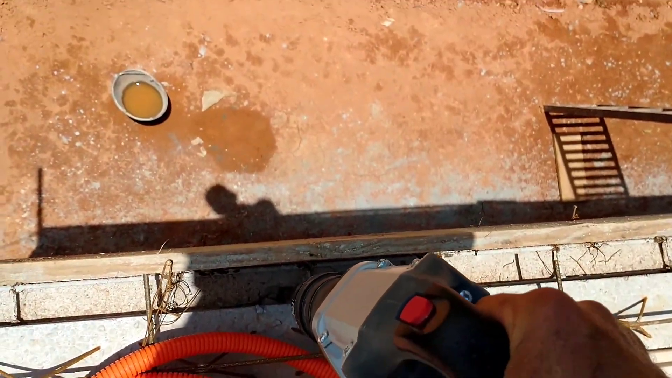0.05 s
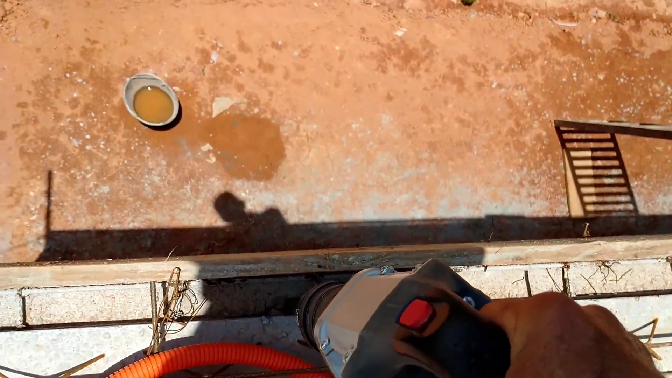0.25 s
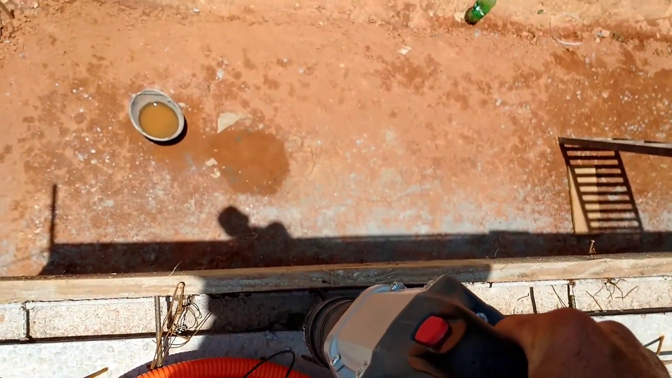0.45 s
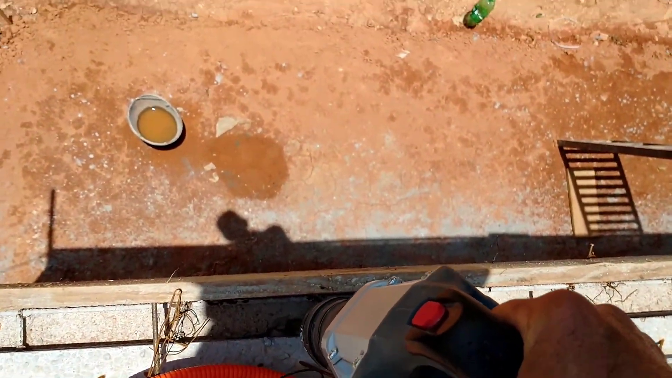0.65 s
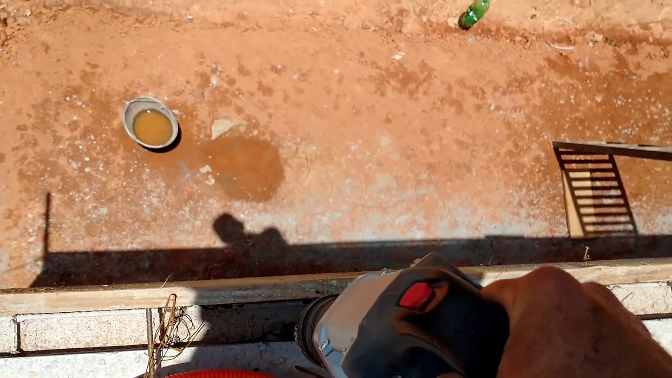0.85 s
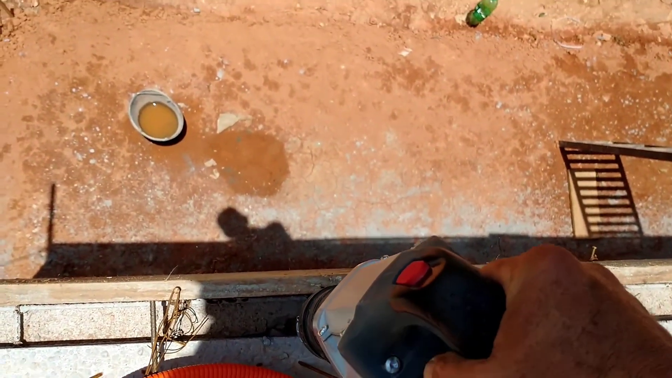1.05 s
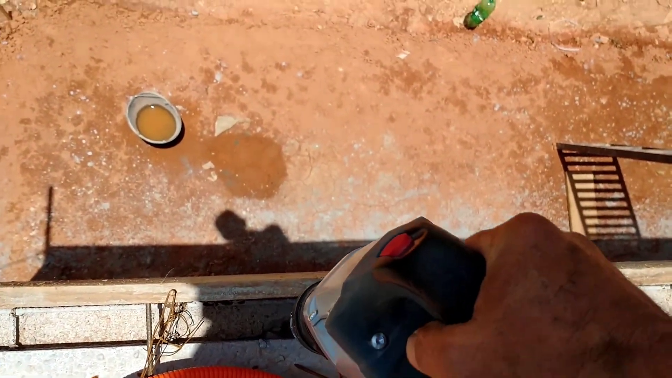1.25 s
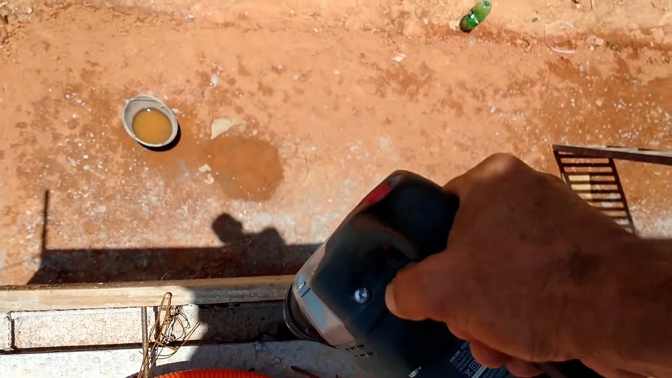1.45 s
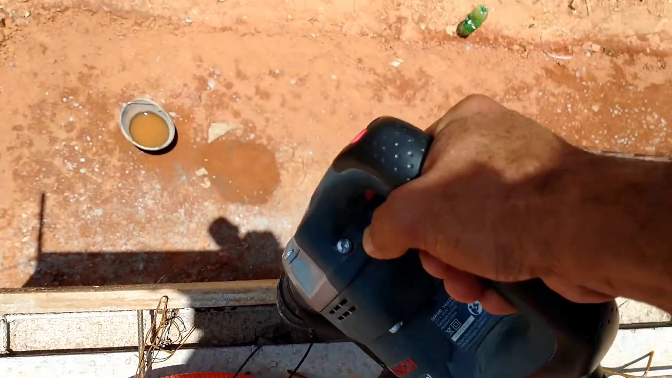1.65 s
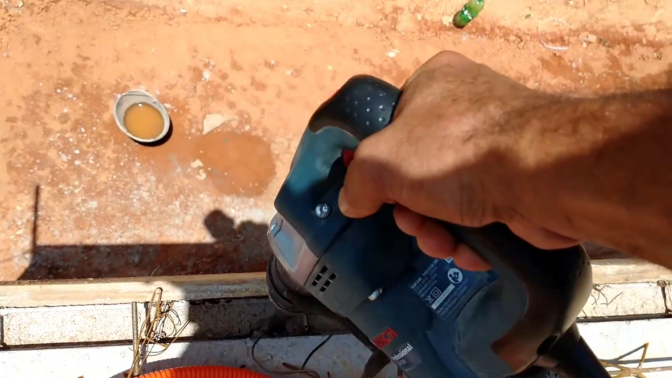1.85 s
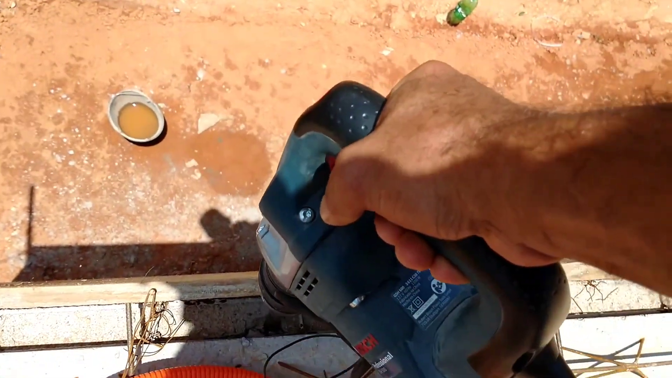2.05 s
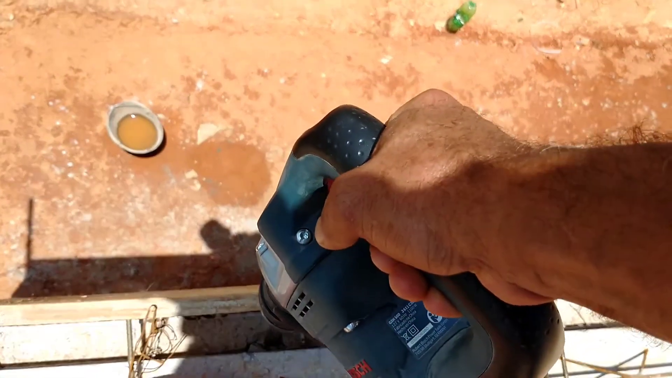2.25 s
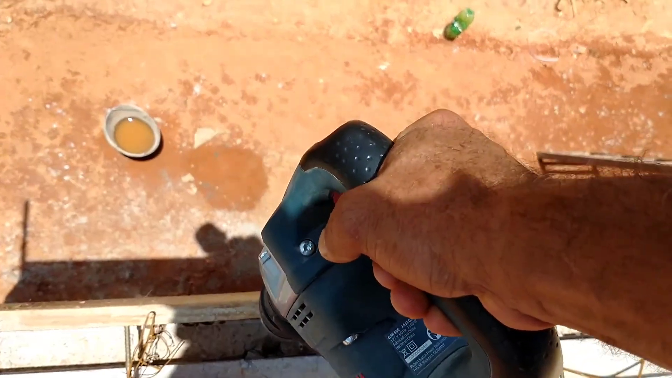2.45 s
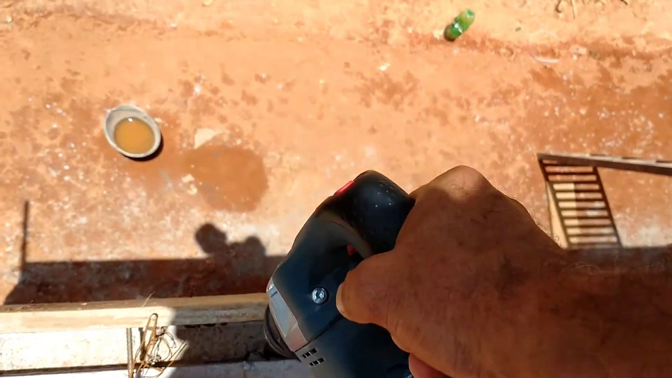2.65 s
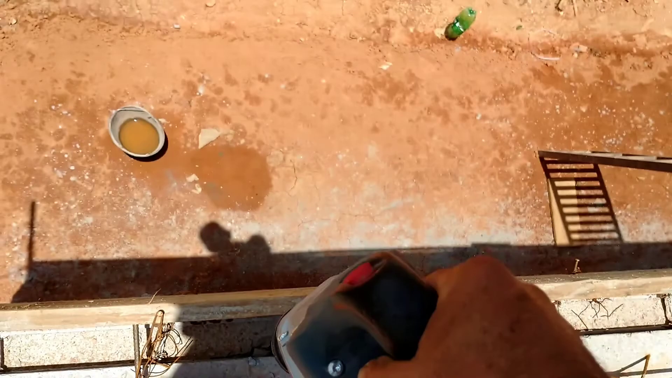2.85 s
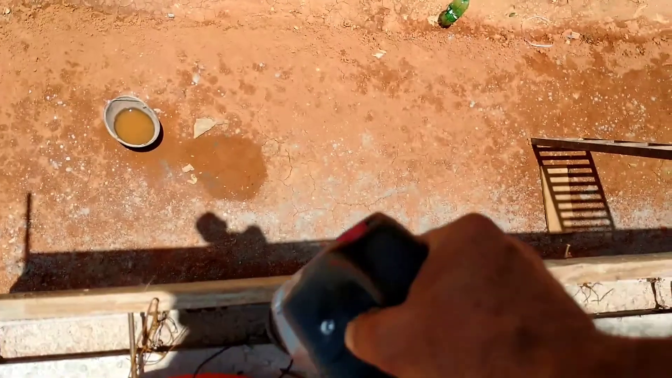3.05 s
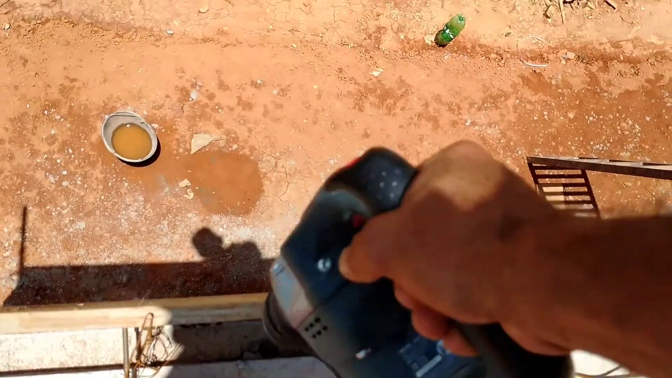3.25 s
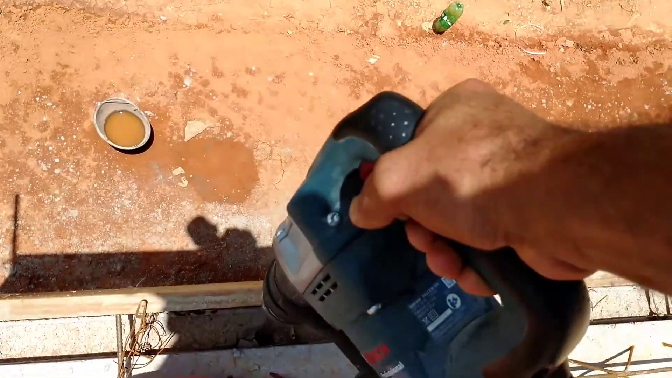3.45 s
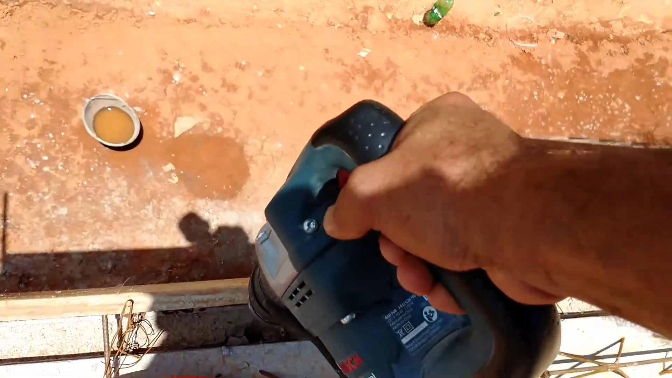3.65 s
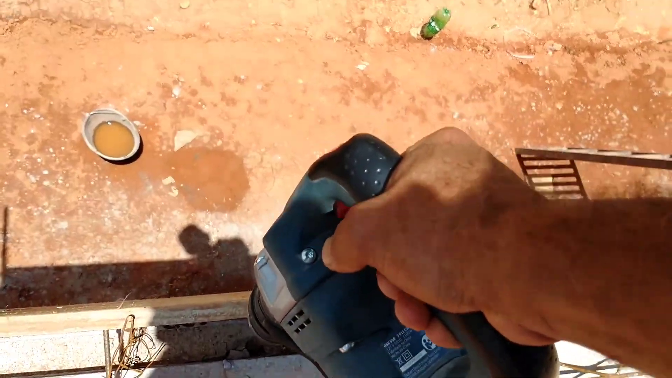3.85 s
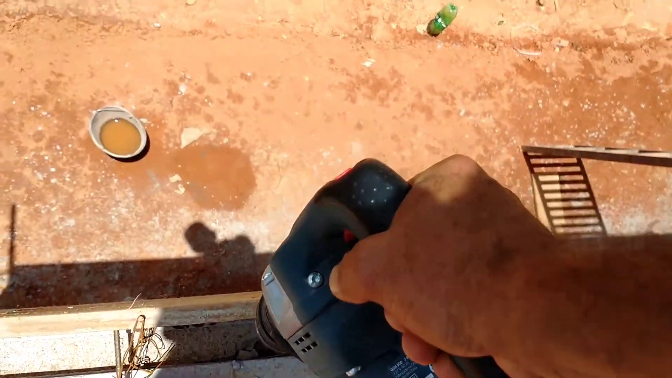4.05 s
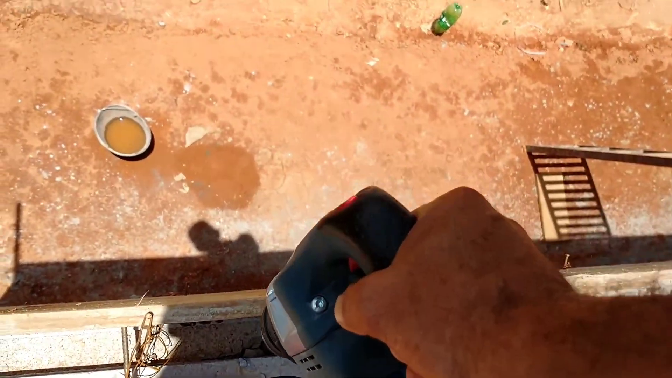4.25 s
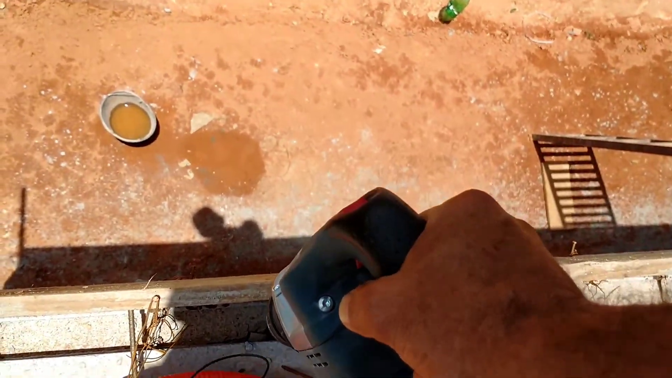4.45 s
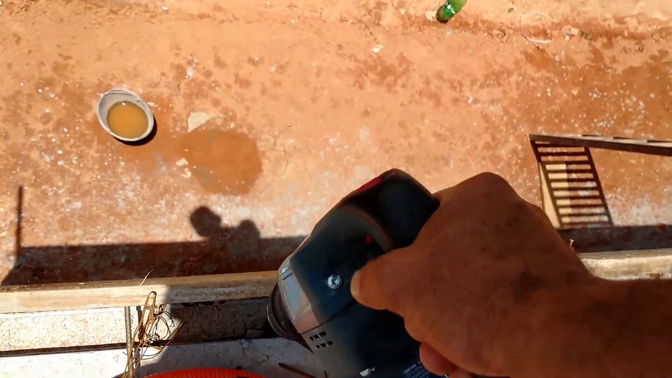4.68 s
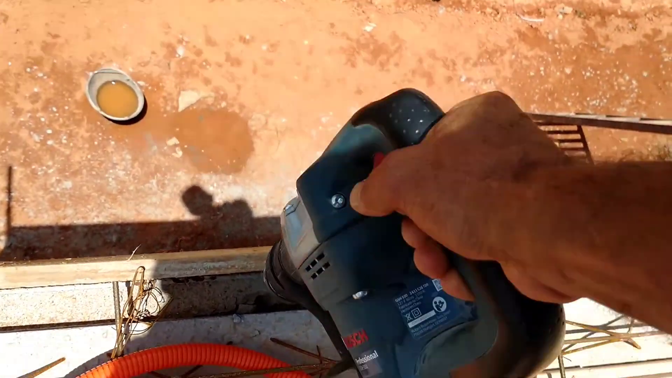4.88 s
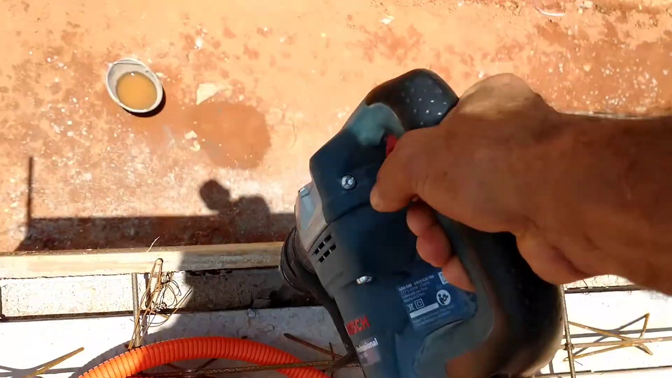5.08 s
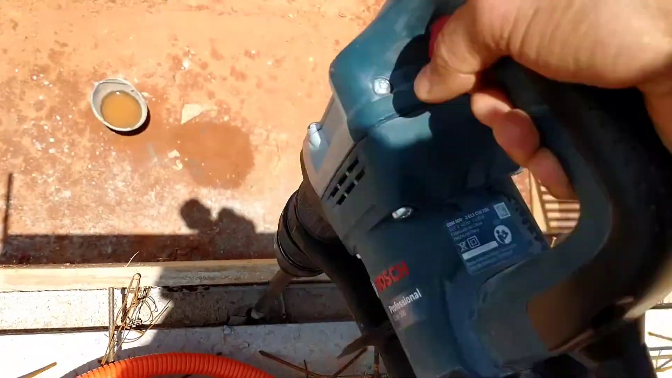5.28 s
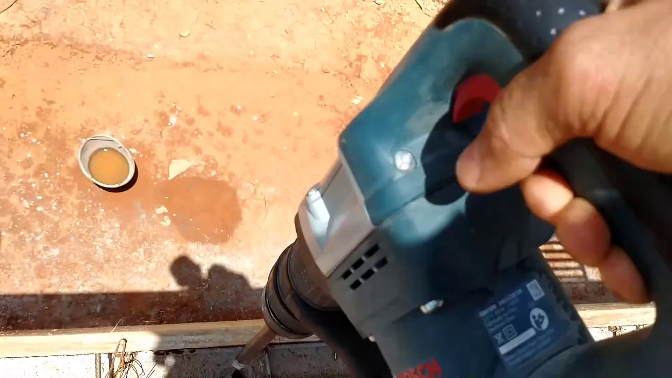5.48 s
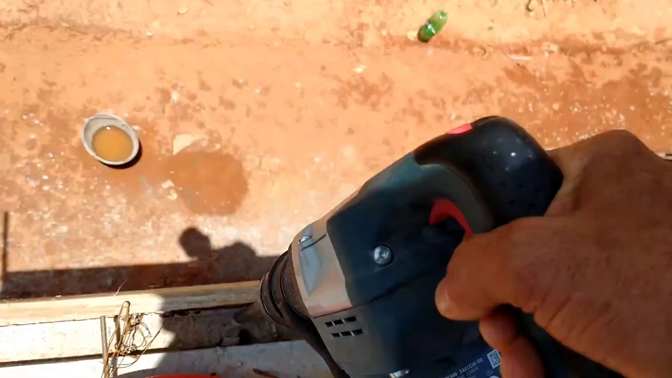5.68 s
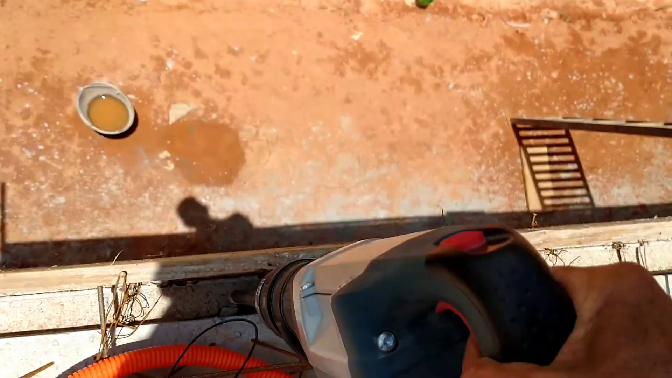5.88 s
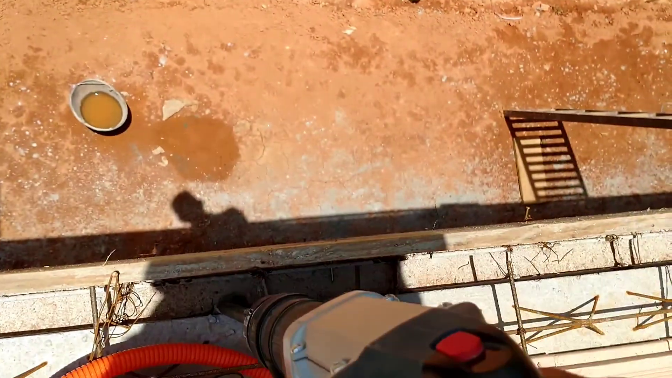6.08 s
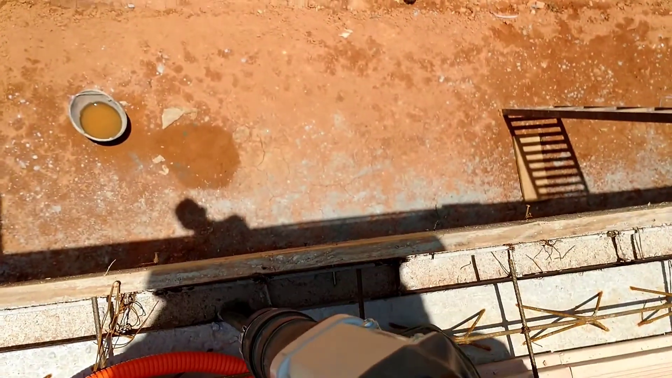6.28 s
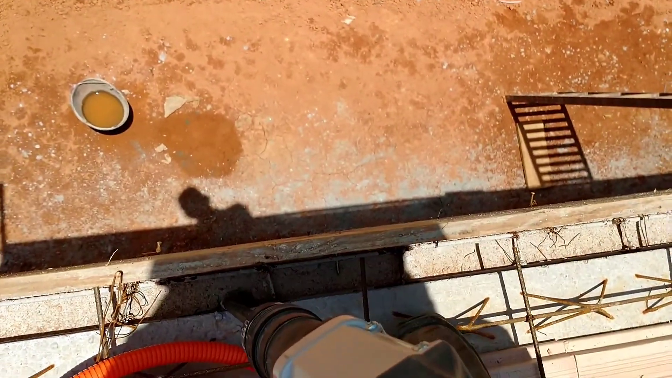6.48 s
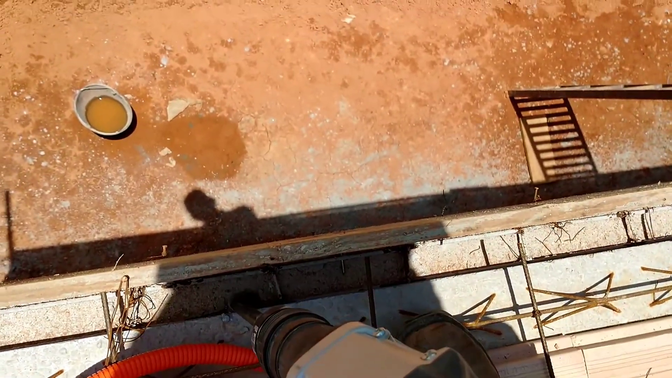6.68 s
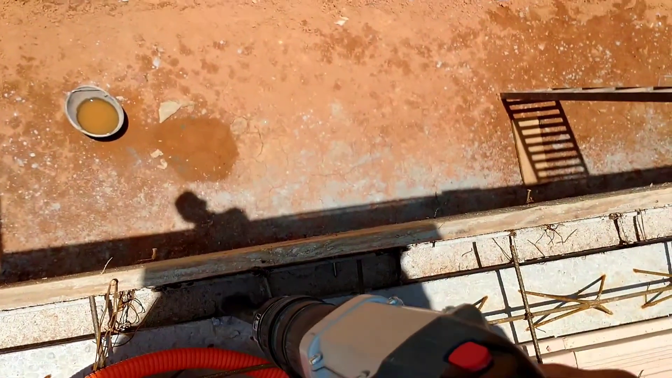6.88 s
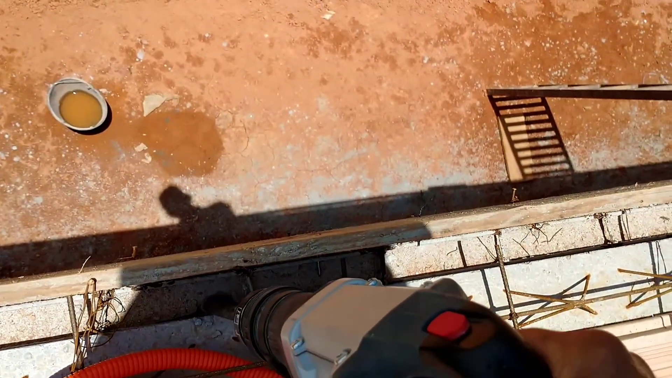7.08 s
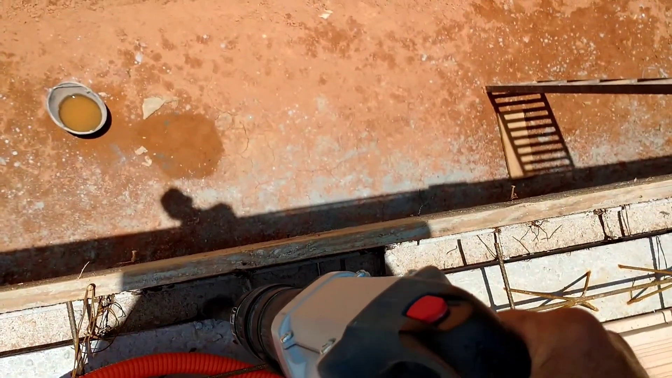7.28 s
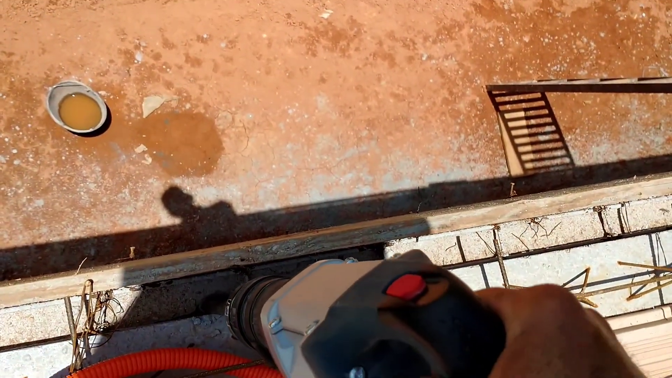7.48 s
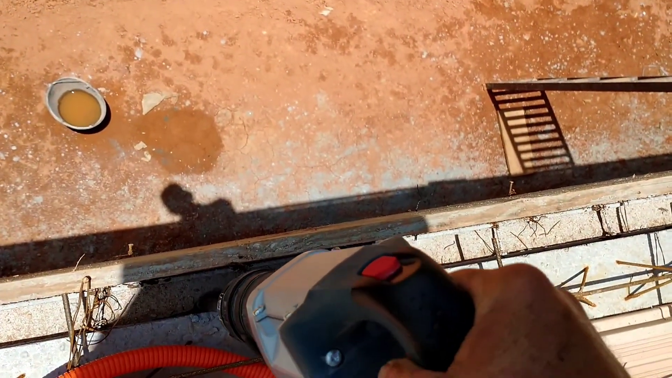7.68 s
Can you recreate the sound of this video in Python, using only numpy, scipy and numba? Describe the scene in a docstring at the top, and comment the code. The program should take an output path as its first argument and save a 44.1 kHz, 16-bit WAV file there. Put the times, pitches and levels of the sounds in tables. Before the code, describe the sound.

Close, harsh machine-gun hammering of a power chisel on concrete outdoors, a brief pause as the motor winds down, then striking resumes.

```python
"""A hand-held electric demolition hammer chisels a concrete edge outdoors, close under a small microphone.
Each crank turn while striking throws one blow that rings slab, chisel and barrel modes and rattles debris.
The motor adds filtered-noise hiss and gear tones locked to the crank angle. The trigger is let go briefly,
then for longer: the motor coasts almost to rest, with brief knocks, clicks and a squeak, and striking
starts again. Short echoes and the quiet noise of the site lie around the tool."""
import sys
import numpy as np
from scipy import signal
from scipy.fft import rfft, irfft
from scipy.io import wavfile
from scipy.ndimage import uniform_filter1d
from numba import njit

SR = 44100
rng = np.random.default_rng(int(sys.argv[2]) if len(sys.argv) > 2 else 0)


def digitize_waveform(pressure):
    """Quantize a signal to 16-bit integers and store it at the path in sys.argv[1].

    Rows of a 2-D input are taken as channels; values are limited to [-1, 1].
    """
    field = np.atleast_2d(pressure).T
    bounded = np.clip(field, -1, 1)
    quanta = np.round(bounded * 32767).astype(np.int16)
    wavfile.write(sys.argv[1], SR, quanta)


N = 340893
T = np.arange(N) / SR
TOP_SPEED = 47.5  # reference crank speed, turns per s
# spans in which the hammer strikes: (from [s], to [s])
STRIKING_SPANS = [(-1, 5.08), (6.54, 9)]
# five groups of modes, the first of the formwork, the rest of the slab:
# (frequency [Hz], relative level [dB], nominal t60 [s])
SLAB_MODES = [
    [(179.6, -8, 0.2), (228.4, -5.5, 0.21)],
    [(332.3, -8, 0.047), (390, -22, 0.019)],
    [(483.3, -5.5, 0.2), (526, -1, 0.11)],
    [(553.5, -2.5, 0.22), (636.7, 13, 0.1), (661, 8, 0.039)],
    [(794, -17.5, 0.062), (872.7, 2, 0.051), (1063, 0.5, 0.025), (1293, -28.5, 0.039), (1442, 1.5, 0.017),
     (1654, -13, 0.099)],
]


def undb(db):
    """Amplitude gain is ten to the power of a twentieth of the decibels."""
    return 10 ** (np.asarray(db) / 20)


def level(x, db=0):
    """Normalise by the root mean square, the amplitude measure of power."""
    return x * undb(db) / np.sqrt(np.mean(x ** 2))


def noise():
    """White noise: equal power in every hertz."""
    return rng.standard_normal(N)


@njit
def ring(x, hz, t60):
    """Damped resonance: a rotating phasor driven by x, with a ring time given for every sample."""
    y, z, turn = np.empty(len(x)), 0j, np.exp(2j * np.pi * hz / SR)
    for i in range(len(x)):
        z = z * turn * (1 - 6.9 / (t60[i] * SR)) + x[i] + 1e-18
        y[i] = z.imag
    return y


def fade(x, t60):
    """Exponential decay: a one-pole filter gives each impulse a tail that falls 60 dB in t60 seconds."""
    return signal.lfilter([1], [1, -np.exp(-np.log(1000) / (t60 * SR))], x)


def colour(x, spectrum, size=2048):
    """Minimum-phase filtering: folding the cepstrum makes a (Hz, dB) shape causal."""
    hz, db = np.transpose(spectrum)
    bins_hz = np.arange(1, size // 2 + 2) * SR / size
    cepstrum = irfft(np.log(undb(np.interp(np.log(bins_hz), np.log(hz), db))))
    cepstrum[1:size // 2] *= 2
    cepstrum[size // 2 + 1:] = 0
    return signal.fftconvolve(x, irfft(np.exp(rfft(cepstrum))))[:N]


def walk(rate):
    """Band-limited chance: random steps, rate per second, smoothed twice, with a spread near 1."""
    k = int(SR / rate)
    steps = np.repeat(rng.standard_normal(N // k + 1), k)
    return 0.86 * uniform_filter1d(uniform_filter1d(steps, k), k)[:N]


def train(seconds, sizes):
    """Impulsive excitation: one sample at each given moment."""
    out = np.zeros(N)
    np.add.at(out, np.clip((seconds * SR).astype(int), 0, N - 1), sizes)
    return out


def during(t, spans):
    """Gating: 1 inside the spans, 0 outside, with 2 ms edges."""
    return sum(np.clip((t - a) * 500, 0, 1) - np.clip((t - b) * 500, 0, 1) for a, b in spans)


def striking():
    """Gate of the striking spans, its edges smoothed over 2000 samples (45 ms)."""
    return uniform_filter1d(during(T, STRIKING_SPANS), size=2000)


def swell(at, width, db):
    """Gaussian gain that falls to 1/e of its peak one width [s] away."""
    return undb(db) * np.exp(-((T - at) / width) ** 2)


def over_time(table):
    """Linear interpolation of a (time, value) table at every sample."""
    return np.interp(T, *np.transpose(table))


def modes(x, table, gain, share, wander_db=0., order=-1):
    """Modal superposition: x drives each mode with wandering strength; order -1 alternates their phase."""
    out = 0
    for k, (hz, db, t60) in enumerate(table):
        drive = gain * undb(wander_db * walk(3.99)) * x
        out = out + order ** k * undb(db) * ring(drive, float(hz), t60 * share)
    return out / np.std(out / gain)


def site_air():
    """Stationary background: the still air of the site as spectrally shaped noise."""
    # (frequency [Hz], spectral density [dB per Hz])
    site_spectrum = [(18, -18), (45, -4), (110, -6), (672, -13), (1660, -30), (1880, -37), (7840, -43),
                     (12000, -48), (15600, -87), (22000, -120)]
    return level(colour(noise(), site_spectrum), -58)


def crank():
    """Rotational dynamics: the trigger pulls the speed to its target; blows or friction slow it when let go."""
    # trigger held: (from [s], to [s])
    trigger_spans = [(.318, 4.232), (4.558, 4.938), (6.455, 9)]
    # speed the motor heads for under its load: (time [s], speed [turns per s])
    full_speed = [(1.807, 46.172), (2.026, 47.763), (3, 47.523), (4.2, 47.903), (4.6, 45.675), (6, 46.101)]
    start_turn, start_speed = .465, 48.501  # turns, turns per s
    loaded_spin_up_s, free_spin_up_s = .191, .138  # time constants
    blow_brake, friction = 66.561, 18.266  # turns per s lost each second
    drag = .34  # share of the speed lost each second
    step = .002  # s
    t = np.arange(0, T[-1] + 2 * step, step)
    v = [start_speed]
    targets = np.interp(t, *np.transpose(full_speed))
    for on, busy, full in zip(during(t, trigger_spans), during(t, STRIKING_SPANS), targets):
        pull = (full - v[-1]) / (loaded_spin_up_s if busy > .5 else free_spin_up_s)
        brake = busy * blow_brake + (1 - busy) * (friction + drag * v[-1])
        v.append(max(v[-1] + step * (on * pull - (1 - on) * brake), .5))
    v = np.array(v[:-1])
    turns = start_turn + step * (np.cumsum(v) - v)
    return np.interp(T, t, v), np.interp(T, t, turns)


def motor_hiss(speed, turns):
    """Turbulent noise of fan and brushes: a power law of speed, modulated twice a turn."""
    # colour of the hiss: (frequency [Hz], spectral density [dB per Hz])
    housing = [(88, -49.5), (150, -11), (213, -12), (328, -9), (439, -6.5), (534, 1), (923, -4), (1080, -8),
               (1310, -5), (2220, -14.5), (2650, -11.5), (4000, -23), (5150, -16), (7770, -16.5),
               (16000, -45.5)]
    # low rumble of the turning motor, growing with speed: (frequency [Hz], spectral density [dB per Hz])
    rumble = [(25, -6), (60, -2), (150, -5), (400, -12), (1500, -52)]
    # hiss swells as the crank shudders over its last compressions: (time [s], level before throb [dB])
    shudders = [(6.04, -42), (6.19, -45), (6.271, -42), (6.39, -51)]
    hiss_power, treble_power, rumble_power = 1.69, 1.65, 0.47  # exponents of amplitude over speed
    relative = speed / TOP_SPEED
    # the slower it turns, the lumpier it runs
    lumpy = np.clip(30 / speed, 0, 1.6)
    throb = undb(lumpy * (1.55 * np.cos(4 * np.pi * turns + 1.65) + 2.1 * walk(45)))
    blowing = undb(-22) * relative ** hiss_power + sum(swell(s, .017, db) for s, db in shudders)
    air = level(colour(noise(), housing))
    treble = signal.sosfilt(signal.butter(2, 3970, "high", fs=SR, output="sos"), air)
    air = air + treble * (relative ** (treble_power - hiss_power) - 1)
    hiss = air * throb * blowing
    hiss += level(colour(noise(), rumble), -44) * relative ** rumble_power
    # loose gears chatter while the tool is not striking, 5 chance ticks a turn
    ticks = (rng.random(N) < 5 * speed / SR) * rng.exponential(size=N)
    return hiss * (1 + .45 * (1 - striking()) * fade(ticks, .02))


def gear_whine(speed, turns):
    """Tooth-mesh tones follow the crank, swell near case resonances and pulse with the piston's compression."""
    # (tooth contacts [per crank turn], relative level [dB], case resonance that lifts it [Hz])
    gears = [(86.1, 0, 2550), (104.3, -9, 4970), (44, -17, 2100), (150.5, -11, 4700)]
    lift_width_hz, lift_db = 900, 13
    flicker_db = (1.5, 4.5)  # striking, free
    stall_speed = 28  # turns per s at which the strain is full
    busy = striking()
    free = 1 - busy
    # gears labour when a slow crank strikes: louder and more sharply pulsed
    strain = busy * np.clip((TOP_SPEED - speed) / (TOP_SPEED - stall_speed), 0, 1) ** 2
    squeeze = np.exp((1.4 + 8 * strain) * (np.cos(2 * np.pi * (turns + 0.12)) - 1))
    # running free the whine is stronger but the case lifts it less
    coast_db, lift_share = 2.5 * free, busy + .2 * free
    whine = 0
    for teeth, db, hz in gears:
        lift = lift_share * lift_db / (1 + (2 * (teeth * speed - hz) / lift_width_hz) ** 2)
        flicker = np.interp(free, (0, 1), flicker_db) * walk(30)
        tone = np.sin(2 * np.pi * teeth * turns + 0.43 * walk(60))
        whine = whine + undb(db + coast_db + lift + flicker) * tone
    # below 20 turns per s it fades as the cube of the speed
    return undb(-37 + 10 * strain) * np.clip(speed / 20, 0, 1) ** 3 * squeeze * whine


def knocks_and_clicks():
    """Impact excitation: short noise bursts ring damped slab modes and a housing mode."""
    # brief knocks and clicks, the last the trigger being pulled:
    # (time [s], relative peak [dB], tick over thud drive [dB])
    impacts = [(5.211, -3, -3), (6.019, -17, -2.5), (6.273, -23.5, -11), (6.385, -29, -22),
               (6.46, -25.5, -7)]
    at, peak_db, tick_db = np.transpose(impacts)
    burst = fade(train(at, undb(peak_db)), 0.0083) * noise()
    clack = 0
    for group in SLAB_MODES[1:]:
        for k, (hz, db, t60) in enumerate(group):
            # level differences halved and ring times cut to 0.28
            clack = clack + (-1) ** k * undb(.5 * db) * ring(burst, float(hz), np.full(N, 0.28 * t60))
    tick = fade(train(at, undb(peak_db + tick_db)), 0.013) * noise()
    housing = ring(tick, 3050., np.full(N, .015))
    tick = .8 * uniform_filter1d(tick, size=4) + .16 * housing
    return undb(-23.5) * clack + undb(-5.0) * tick


def squeak():
    """Frequency glide: one brief sine falls in pitch under a half-sine envelope."""
    start_s, length_s, from_hz, to_hz = 6.392, .03, 7400, 5300
    u = np.clip((T - start_s) / length_s, 0, 1)
    pitch = to_hz + (from_hz - to_hz) * (1 - u) ** 2
    return undb(-56) * np.sin(np.pi * u) * np.sin(2 * np.pi * np.cumsum(pitch) / SR)


def blow_trains(speed, turns):
    """Periodic impact: one blow per crank turn, then a weaker rebound about 7 ms later."""
    at = np.interp(np.arange(1, int(turns[-1]) + 1), turns, T)
    strikes = sum((at > a) & (at < b) for a, b in STRIKING_SPANS) > 0
    chance = rng.standard_normal((len(at), 3))[strikes].T
    at = at[strikes]
    # fewer blows a second carry the same power, but a slow crank cannot fling the striker hard
    rate = np.interp(at, T, speed)
    blows = train(at, undb(0.27 * chance[0]) * np.clip(rate / 28, 0, 1) ** 3 / np.sqrt(rate))
    rebounds = train(at + .007 + .001 * chance[1], undb(-31.5 + 1.0 * chance[2]))
    return blows, rebounds


def slab_thud(blows, rebounds, speed, slab_db, slab_hz, form_db):
    """Modal response of slab and formwork; groups far from the favoured pitch respond less."""
    tops = [max(group, key=lambda mode: mode[1])[0] for group in SLAB_MODES[1:]]
    # 10.5 dB weaker one octave away, growing as the square of the distance
    gains = undb([form_db] + [slab_db - 10.5 * np.log2(hz / slab_hz) ** 2 for hz in tops])
    # slower blows ring shorter
    share = np.clip((speed / TOP_SPEED) ** 1.3, .2, 3)
    push = uniform_filter1d(blows + .5 * rebounds, size=9)
    return sum((-1) ** k * modes(push, group, gains[k], share, order=1)
               for k, group in enumerate(SLAB_MODES))


def steel_ring(blows, rebounds, turns, chisel_db, tilt_db, free_db):
    """Boundary-dependent modes: the tip held by concrete damps the chisel, the freed shank rings longer."""
    # tip held, two groups, mostly below and mostly above 7.5 kHz:
    # (frequency [Hz], relative level [dB], t60 [s])
    chisel = [
        [(5084, -2, 0.022), (4730, -14, 0.029), (5374, 4.5, 0.014), (6800, -39, 0.011), (6556, 17.5, 0.0079),
         (6880, 14, 0.011), (7270, 12.5, 0.027), (13500, -9, .008)],
        [(7572, 13, 0.0095), (7707, 16, 0.016), (8160, 14.5, 0.0063), (8830, 9, 0.011), (9510, 0.5, 0.014),
         (14740, 2, 0.011), (15300, -13, .015), (5740, 1, 0.014)],
    ]
    # lengthwise modes of the shank: (frequency [Hz], relative level [dB], t60 while free [s])
    free_ring = [(7430, 8, 0.11), (7560, -1.5, 0.05), (14620, -4, .05)]
    # modes of the metal barrel: (frequency [Hz], relative level [dB], t60 [s])
    barrel_modes = [(2130, -2.5, 0.034), (2296, -2, 0.038), (2440, -3.5, 0.033), (2686, 2.5, 0.029),
                    (2970, 2.5, 0.026), (3106, 3, 0.012), (3435, -8, 0.05)]
    # how loud the blows ring the barrel: (time [s], relative level [dB])
    barrel_db = [(.5, -33), (1.6, -23), (2.0, -31), (3.7, -25.5), (4.3, -29.5), (6.8, -39), (7.3, -26.5)]
    wander_db = 2.2
    held = np.ones(N)
    # steel on steel: a clean hit, then a short splutter of contacts, different every blow
    hits = blows + rebounds
    hit = 5.1 * hits + 0.36 * fade(hits, 0.013) * noise()
    # the tool holder passes each hit on through one broad mode
    chuck_hz, chuck_t60 = 6980., .0005 * held
    contact = ring(hit, chuck_hz, chuck_t60)
    first = modes(contact, chisel[0], undb(chisel_db - tilt_db / 2), held, wander_db)
    second = modes(contact, chisel[1], undb(chisel_db + tilt_db / 2), held, wander_db)
    barrel = modes(hit, barrel_modes, undb(over_time(barrel_db)), held, wander_db)
    # the shank rings freely until the tip seats again, near the middle of the turn
    unseated = (turns % 1 < .55 + .12 * walk(40)) & (during(T - .01, STRIKING_SPANS) > 0)
    strong = contact + ring(15 * blows, chuck_hz, chuck_t60)
    free = modes(strong, free_ring, undb(free_db), np.where(unseated, 1, .2), wander_db)
    return undb(3.5) * (first + second) + undb(-11.5) * free + undb(-3.5) * barrel


def body_shake(turns):
    """Harmonic vibration: the body sways at twice and shakes at three times the crank speed."""
    # stronger sway when the tool lurches: (time [s], width [s], level before a common lift [dB])
    lurches = [(0.031, 0.072, -35), (.85, .2, -56), (5.0, .25, -38), (7.07, 0.18, -32)]
    # shake at three times the crank speed: (time [s], level before a common lift [dB])
    shake = [(0.0, -39), (.85, -53), (1.57, -37.5), (2.0, -44.5), (2.75, -39), (4.19, -36), (4.4, -48.5),
             (6.6, -45.5), (6.8, -35), (7.1, -40), (7.45, -41)]
    twice = undb(-57) + sum(swell(*lurch) for lurch in lurches)
    thrice = undb(over_time(shake))
    # the common lift of 6 dB wavers a little
    return striking() * sum(gain * undb(6.0 + 0.6 * walk(12)) * np.sin(2 * np.pi * k * turns)
                            for k, gain in ((2, twice), (3, thrice)))


def debris_rattle(blows, rebounds):
    """Granular noise: a decaying, unsteady burst of shaped noise follows each impact."""
    # (frequency [Hz], spectral density [dB per Hz])
    debris = [(59, -29), (100, -10.5), (135, -26), (255, -27), (328, -2), (406, -11.5), (471, -4),
              (872, -6.5), (1870, -26), (2750, -11), (3780, -23), (7450, -15), (10900, -32.5), (14700, -27),
              (16000, -48)]
    rattle = fade(blows + rebounds, 0.053) * undb(1.4 * walk(300)) * noise()
    return level(colour(rattle, debris), -26.0)


def hammer(speed, turns):
    """Common excitation: the same impacts drive slab, steel and debris, as the chisel's seat changes."""
    # how the chisel sits in the concrete, levels relative: (time [s], slab level [dB],
    # favoured slab pitch [Hz], formwork level [dB], held chisel level [dB],
    # second over first chisel group [dB], free ring level [dB])
    seat = [(0.0, -22.5, 630, -32, -25.5, 3, -37), (.3, -19, 620, -31.5, -27.5, 1, -33),
            (.62, -19.5, 616, -35.5, -27.5, 5, -24), (1.1, -21, 810, -33.5, -26.5, 7, -32),
            (1.45, -22, 614, -31.5, -23, 2, -32), (1.72, -18.5, 575, -30.5, -23, -3, -28),
            (1.9, -14, 480, -41.5, -25.5, -3, -25), (2.25, -17, 610, -31.5, -28.5, -0.5, -44),
            (2.7, -16, 590, -42, -27.5, -3.5, -28), (3.03, -16.5, 557, -42, -28, 8, -37),
            (3.12, -20.5, 640, -44, -26.5, -0.5, -42), (3.55, -19.5, 560, -39, -27, -5, -40),
            (3.74, -17, 650, -64, -26, -5, -52), (4.24, -16, 586, -51, -30.5, -11, -38),
            (4.55, -14, 490, -47, -37.5, 2, -36), (4.85, -16.5, 537, -29, -30.5, -3, -6.5),
            (5.05, -19.5, 500, -32, -41, -13, -6), (6.6, -51, 500, -36, -44.5, -31.5, -8),
            (6.78, -24, 453, -27, -28, -7.5, -7.5), (7.15, -23.5, 526, -29, -23.5, 1.5, -8),
            (7.5, -22.5, 483, -32.5, -25.5, -3, -10), (7.7, -20, 570, -27, -27, -9, -8.5)]
    s, *columns = np.transpose(seat)
    slab_db, slab_hz, form_db, chisel_db, tilt_db, free_db = [np.interp(T, s, c) for c in columns]
    blows, rebounds = blow_trains(speed, turns)
    thud = slab_thud(blows, rebounds, speed, slab_db, slab_hz, form_db)
    steel = steel_ring(blows, rebounds, turns, chisel_db, tilt_db, free_db)
    return undb(-1.0) * thud + steel + body_shake(turns) + debris_rattle(blows, rebounds)


def echoes_of(tool):
    """Diffuse reflection: slab and boards return a decaying random echo pattern after 3 ms."""
    t = T[:SR // 8]
    echoes = rng.standard_normal(SR // 8) * undb(-60 * t / .28) * (t > .003)  # t60 .28 s
    return signal.fftconvolve(tool, echoes / np.sqrt(np.sum(echoes ** 2)))[:N]


def scene():
    """Linear superposition of the site, the tool with its knocks and clicks, and the echoes."""
    speed, turns = crank()
    motor = motor_hiss(speed, turns) + gear_whine(speed, turns)
    tool = hammer(speed, turns) + motor + knocks_and_clicks() + squeak()
    return (tool + undb(-15.5) * echoes_of(tool) + site_air())[None]


def record(dry):
    """Transducer limits: the microphone drops bass and dips above 10 kHz; peaks round off, the top is cut."""
    # microphone response: (frequency [Hz], gain [dB])
    mic = [(30, -12), (70, -17.5), (130, -2), (9000, -1.5), (10300, -6), (11800, -14.5), (13000, -10),
           (14500, -3.5), (16000, -12)]
    headroom = .89
    heard = headroom * np.tanh(1.001 * colour(dry[0], mic)[None] / headroom)
    return signal.sosfilt(signal.ellip(10, .2, 80, 16000, fs=SR, output="sos"), heard)


dry = scene()
out = record(dry)
digitize_waveform(out)
```